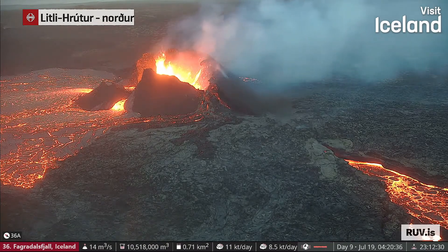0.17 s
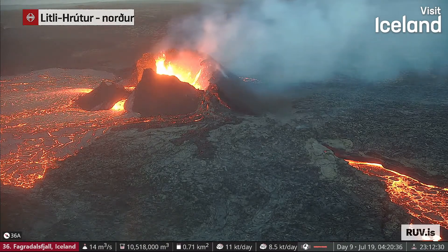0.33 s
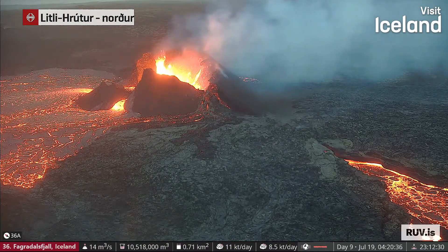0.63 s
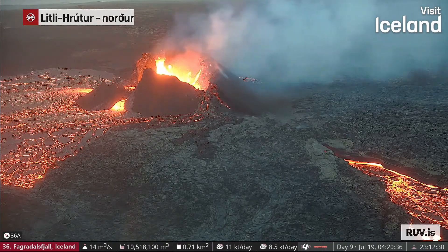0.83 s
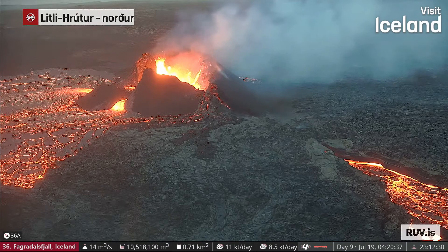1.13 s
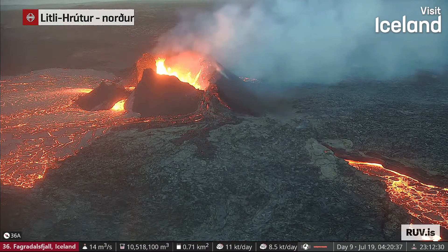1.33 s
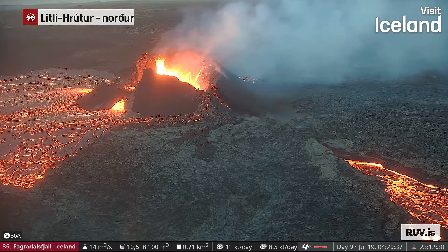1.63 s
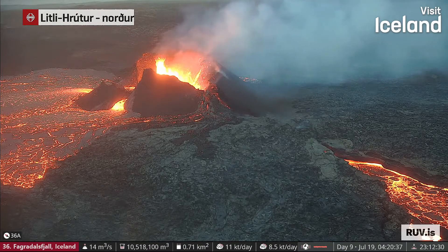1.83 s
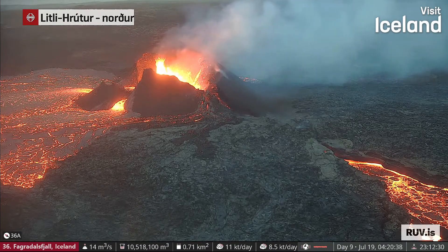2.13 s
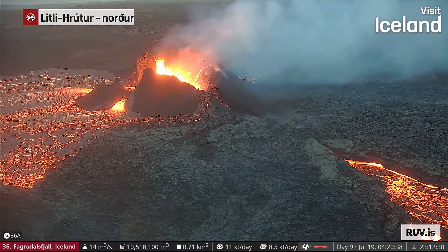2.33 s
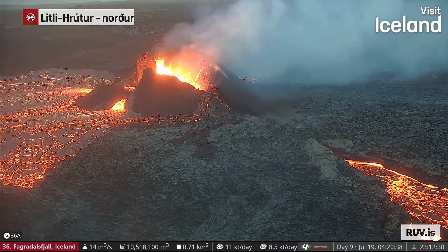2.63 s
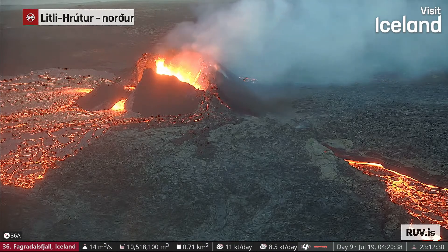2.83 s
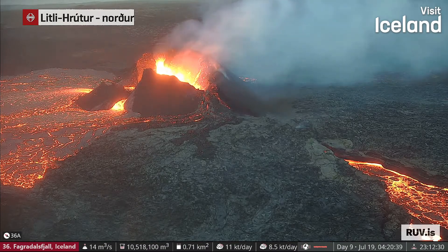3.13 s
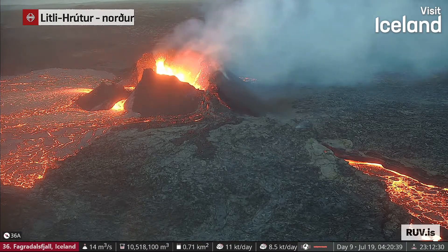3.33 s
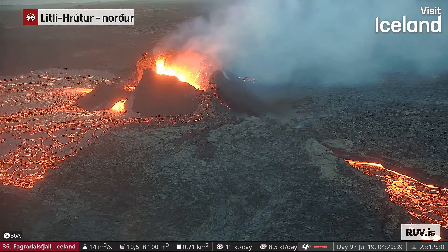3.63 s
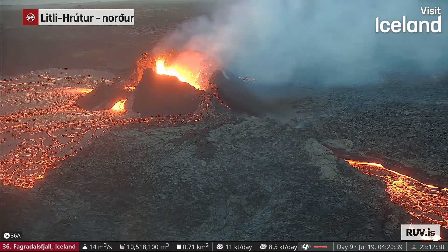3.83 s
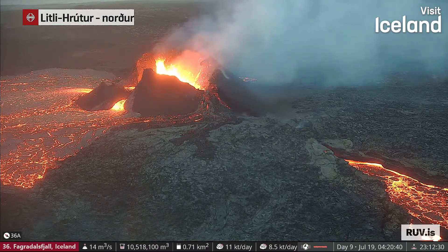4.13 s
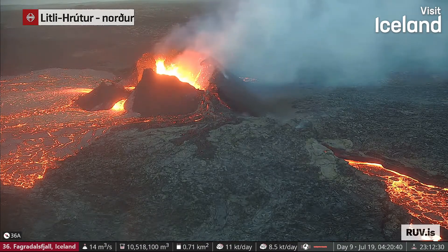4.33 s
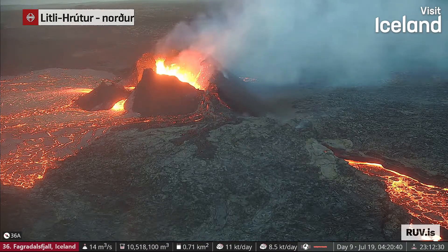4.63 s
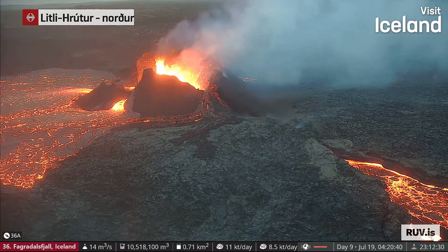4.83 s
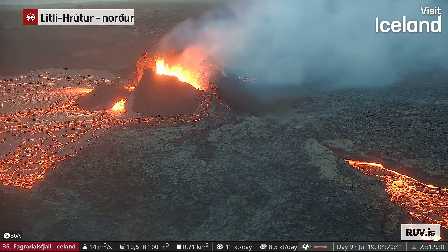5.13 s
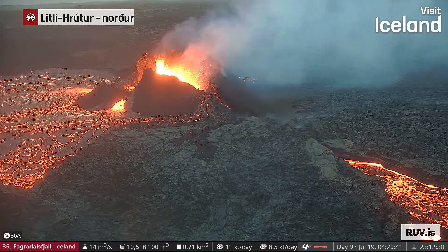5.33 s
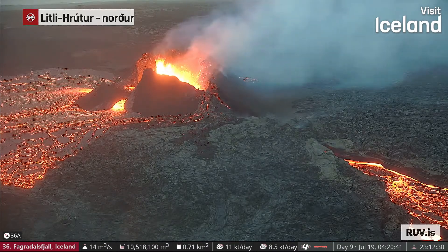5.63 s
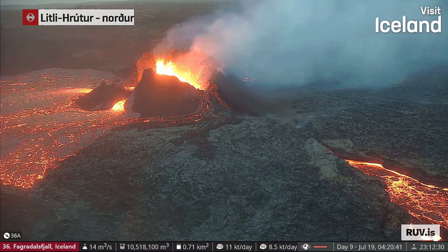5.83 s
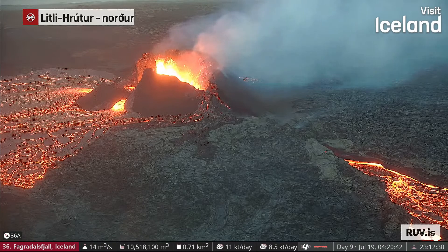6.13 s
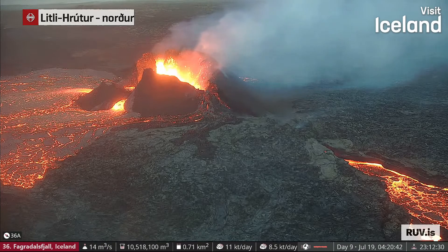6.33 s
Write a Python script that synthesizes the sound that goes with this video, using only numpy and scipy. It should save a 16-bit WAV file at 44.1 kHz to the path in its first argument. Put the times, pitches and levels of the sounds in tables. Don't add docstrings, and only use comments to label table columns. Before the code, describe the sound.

Wind buffets a close microphone with low thumps and a wavering hollow howl, over the steady deep rumble of a distant erupting volcanic vent.

```python
import sys
import numpy as np
from scipy import signal
from scipy.fft import rfft, irfft
from scipy.io import wavfile
from scipy.ndimage import uniform_filter1d, map_coordinates

SR = 44100
rng = np.random.default_rng(int(sys.argv[2]) if len(sys.argv) > 2 else 0)


def decibels_to_gain(level_db):
    exponent = np.asarray(level_db, float) / 20
    return 10 ** exponent


def dump(signal):
    limited = np.clip(np.atleast_2d(signal).T, -1, 1)
    pcm = np.round(limited * 32767).astype(np.int16)
    wavfile.write(sys.argv[1], SR, pcm)


N = 285591

HISS_SPECTRUM = [(1500, -9), (3200, 5), (4300, 6.5), (5200, 1.5), (7000, 0), (8000, -5.5), (10000, -32)]
SIZZLE_SPECTRUM = [(5000, -39.5), (7500, -3.5), (9000, 4), (10500, 1), (12000, -4), (14200, -6.5),
                   (15000, -38.5)]
THUD_SPECTRUM = [(250, -29.5), (480, 6.5), (700, 5.5), (1100, -5), (1500, -19), (2200, -40.5)]
PUFF_SPECTRUM = [(1000, -29), (1600, 3.5), (2300, -0.5), (2900, -12.5), (3600, -36)]
SPIT_SPECTRUM = [(2800, -27), (3700, -3), (4400, -0.5), (5300, -6), (6500, -5.5), (8500, -29.5)]
RUMBLE_SPECTRUM = [(60, -30), (200, 5.5), (260, 0), (400, -3), (500, -12), (650, -29.5), (1200, -64.5)]
ROAR_SPECTRUM = [(200, -27.5), (450, 9), (650, 1), (1000, -9), (1600, -15), (2000, -21.5), (2500, -23),
                 (3100, -33), (6000, -64)]
PUSH_SPECTRUM = [(1, -8), (4, 1), (18, 1), (30, -14), (60, -63.5)]
BUFFET_SPECTRUM = [(10, -31), (24, -5), (40, 0.5), (58, -1.5), (75, -15), (120, -48.5)]
FLUTTER_SPECTRUM = [(30, -39), (55, -13), (70, -3), (130, -1.5), (200, -6.5), (260, -30), (500, -76.5)]

# centre in seconds, rise in dB.
SIZZLE_SWELLS = [(.66, 4.6), (3.79, 1), (5.2, 1.1), (6.121, 2)]
# centre in seconds, peak level in dB, half length in seconds.
CREAKS = [
    (3.058, -58.5, 0.012),
    (1.925, -65, 0.0066),
    (1.4, -69, .006),
    (.877, -69, .006),
    (6.18, -71, .02),
]
# centre in Hz, width in Hz, level in dB.
SHELL_MODES = [
    (2300, 160, 2),
    (4400, 350, -3.5),
    (8900, 900, -4.5),
]
# centre in seconds, half length in seconds, strength in dB, brightness in dB.
SPATTER_BURSTS = [(.183, .015, -63.5, -1), (.22, 0.0059, -62.5, -3.5), (.594, .0027, -68.5, 6),
                  (.652, .01, -64.5, -2.5), (.875, 0.0092, -63.5, 4.5), (1.125, 0.006, -57, -1.5),
                  (1.332, .0051, -58, -3.5), (1.544, 0.014, -63, 3), (1.707, 0.002, -64.5, -1.5),
                  (1.742, 0.018, -72.5, -11.5), (1.873, .0045, -60.5, -5), (2.066, 0.0088, -70, -7.5),
                  (2.216, 0.017, -69, -10.5), (2.883, .01, -77, -5), (.373, .0082, -69.5, 1),
                  (3.702, 0.0069, -66.5, 1), (4.004, 0.014, -63, 0.5), (4.067, 0.0035, -64, 1.5),
                  (4.192, .0082, -64, 2.5), (4.443, .011, -61, -2.5), (4.567, 0.0032, -70, 2),
                  (4.717, 0.021, -63, -2), (4.943, 0.016, -64, -1.5), (4.997, .0031, -61, -1),
                  (5.136, .01, -60.5, 1.5), (5.326, 0.0068, -66, -6.5), (5.419, 0.012, -62, -1),
                  (5.615, .0062, -65.5, 1.5), (5.688, 0.0036, -56.5, 6), (6.18, .018, -68.5, 7)]
# Thud, puff, spit and fizz in an average burst, each in dB.
BURST_SHARES_DB = (12.5, -1, -8.5, -17)
# change of the same four, in dB per dB of brightness.
BRIGHT_TILT = (-2.5, -0.14, 0.44, 1.3)
# time in seconds, effort in dB.
VENT_EFFORT = [(.06, -1), (.18, 4), (.36, 1.5), (.5, 1.5), (.9, 4), (1.24, 1), (1.5, -2.5), (2, 1),
               (2.2, -2), (2.6, 1), (3.15, 0.5), (3.54, 2.5), (3.8, 1.5), (4.36, -1.5), (4.47, 2.5),
               (4.9, -1.5), (5.4, 2.5), (6.4, -1)]
# centre in seconds, rumble over the effort in dB.
GAS_SLUGS = [(.16, 0.5), (.5, 5), (1.12, 0.5), (1.42, -1), (2.02, 0.5), (2.07, -4.5), (3.64, -5),
             (3.79, 3.5), (3.91, 1), (4, -2.5), (4.2, 5.5), (4.39, -4), (4.45, 3), (4.71, 3.5),
             (4.84, -3.5), (4.96, -4), (5.2, -6.5), (5.3, 1.5), (5.38, -2.5), (5.5, 3), (5.56, -4),
             (6.28, 0.5), (6.44, 7)]
# centre in seconds, peak level in dB, half length in seconds.
GUST_FRONTS = [
    (4.032, -17.5, .02),
]
# centre in seconds, strength over the steady wind in dB,
# size from 0 (small) to 2 (large).
EDDIES = [(.14, 2, 1.3), (.4, 9.5, 1.4), (1.15, 3, 2), (1.68, 9.5, 2), (1.84, 3.5, 0.32), (1.98, 10.5, 1.5),
          (2.08, 2, 0.38), (2.26, 15, 1.63), (2.4, 3, 0.12), (2.78, 10, 2.9), (2.85, 6, 0),
          (3.179, 4.5, 0.26), (3.239, 7.5, 2.2), (.6, 2.5, 0.41), (3.5, 6.5, 0.84), (4, 16.5, 2.2),
          (4.04, 1.5, 0.5), (4.34, 5.5, 1.3), (4.5, 13.5, 1.7), (4.6, 0.5, 0.065), (4.78, 10, 1.7),
          (5, -8, 0.62), (5.04, -5, 0.24), (5.2, 4, 1.7), (5.5, 3, 1.9), (5.6, 1, 1.3), (5.9, 5.5, 3.1),
          (6.2, 1.5, 2.4), (6.27, 3, 0), (6.36, 14, 3.2)]
# time in seconds, shedding rate in Hz.
SHEDDING_RATE = [(0.03, 148), (0.5, 172), (0.66, 206), (0.82, 190), (1.5, 172), (1.85, 168), (2.1, 118),
                 (2.5, 174), (2.82, 187.2), (3.36, 155), (3.75, 172), (4.35, 150), (4.53, 182), (4.96, 182),
                 (5.19, 143), (5.38, 187), (5.7, 182), (6.44, 149.4)]
# centre in seconds, rise over the loose howl in dB.
LOCK_INS = [(.35, 6), (.58, 6.5), (.8, 13), (1.06, 11.5), (1.3, 6), (1.8, 3), (2.12, 4), (2.55, 7),
            (2.74, 10.5), (3.1, 5.5), (3.33, 9.5), (3.55, 2.5), (4.01, 5), (4.37, 1), (4.6, 1.5), (4.95, 5),
            (5.17, 6), (5.37, 8.5), (5.6, 5.5), (5.85, 8), (6.05, 3.5), (6.25, 5.5), (6.45, 6)]
# centre in seconds, rise in dB.
MOUNT_GUSTS = [(.52, 20), (.72, 16), (1, 16), (2.45, 15)]


def unit(x):
    return x / np.sqrt(np.mean(np.abs(x) ** 2) + 1e-20)


def curves(rows):
    s, *columns = np.transpose(rows)
    return [np.interp(np.arange(N) / SR, s, column) for column in columns]


def swells(rows, half_s):
    t = np.arange(N) / SR
    return sum(db * np.exp(-.5 * ((t - s) / half_s) ** 2) for s, db in rows)


def wobble(rate):
    knots = rng.standard_normal(int(N * 80 / SR) + 4)
    return map_coordinates(knots, [np.arange(N) * min(rate, 80) / SR])


def noise(spectrum, patchy_db=0):
    z = signal.stft(rng.standard_normal(N + SR), nperseg=512)[2]
    patches = uniform_filter1d(rng.standard_normal(z.shape), size=8, axis=0)
    patches = uniform_filter1d(patches, size=6, axis=1)
    white = signal.istft(z * decibels_to_gain(patchy_db * unit(patches)), nperseg=512)[1]
    f, db = np.transpose(spectrum)
    hz = np.fft.rfftfreq(len(white), 1 / SR)
    colour = decibels_to_gain(np.interp(np.log(hz + 1), np.log(f + 1), db, left=-120, right=-120))
    coloured = irfft(rfft(white) * colour, len(white))
    return unit(coloured[SR // 2:][:N])


def steadied(x, hold_s):
    power = np.abs(uniform_filter1d(x ** 2, size=round(hold_s * SR)))
    return unit(x / np.sqrt(0.4 + power))


def air():
    effort_db, = curves(VENT_EFFORT)
    fade_db = 0.23 * np.arange(N) / SR
    hiss_db = -71 + .3 * effort_db - fade_db
    breath = wobble(9)
    hiss = decibels_to_gain(hiss_db + 0.53 * breath) * noise(HISS_SPECTRUM, patchy_db=-1.0)
    sizzle_db = -73 + swells(SIZZLE_SWELLS, half_s=.2)
    sizzle_gain = decibels_to_gain(sizzle_db + .6 * breath + .6 * wobble(5.4))
    return hiss + sizzle_gain * noise(SIZZLE_SPECTRUM, patchy_db=2.0)


def creak():
    t = np.arange(N) / SR
    hz = np.fft.rfftfreq(N, 1 / SR)
    shell = sum(decibels_to_gain(db) * np.exp(-.5 * ((hz - centre) / width) ** 2) / np.sqrt(width)
                for centre, width, db in SHELL_MODES)
    scrape = unit(irfft(rfft(rng.standard_normal(N)) * shell, N))
    return scrape * sum(decibels_to_gain(db) * np.exp(-((t - s) / half) ** 4) for s, db, half in CREAKS)


def spatter():
    t = np.arange(N) / SR
    s, half, db, bright_db = np.transpose(SPATTER_BURSTS)
    puffs = [np.exp(-.5 * ((t - at) / max(width, .002)) ** 2) for at, width in zip(s, .8 * half)]
    out = np.zeros(N)
    for k, spectrum in enumerate((THUD_SPECTRUM, PUFF_SPECTRUM, SPIT_SPECTRUM, SIZZLE_SPECTRUM)):
        tilt = np.where(bright_db > 0, BRIGHT_TILT[k], k - 3 / 2)
        gains = decibels_to_gain(db + BURST_SHARES_DB[k] + bright_db * tilt)
        out += noise(spectrum) * (gains @ puffs)
    return out


def vent():
    effort_db, = curves(VENT_EFFORT)
    surge = wobble(12)
    rumble = unit(decibels_to_gain(0.3 * surge) * noise(RUMBLE_SPECTRUM, patchy_db=1.25))
    roar = unit(decibels_to_gain(0.53 * surge + 0.2 * wobble(30)) * noise(ROAR_SPECTRUM, patchy_db=1.6))
    rumble_db = -31 + effort_db + swells(GAS_SLUGS, half_s=0.026)
    fade_db = 0.67 * np.arange(N) / SR
    roar_db = -43.5 + 0.61 * effort_db - fade_db
    return decibels_to_gain(rumble_db) * rumble + decibels_to_gain(roar_db) * roar


def eddies(size):
    half_s, spread = (0.059, 0.038, 0.055)[size], 0.46
    rows = [(s, db * np.exp(-.5 * ((big - size) / spread) ** 2)) for s, db, big in EDDIES]
    return swells(rows, half_s)


def wind():
    t = np.arange(N) / SR
    fronts, calm = np.zeros(N), np.ones(N)
    for s, db, half in GUST_FRONTS:
        x = (t - s) / half
        fronts += decibels_to_gain(db) * x * np.exp(.5 - .5 * x ** 2)
        calm -= np.exp(-((t - s) / .12) ** 2)
    push = decibels_to_gain(-38 + eddies(size=2)) * calm * steadied(noise(PUSH_SPECTRUM), hold_s=0.069)
    buffet = decibels_to_gain(-29 + eddies(size=1)) * steadied(noise(BUFFET_SPECTRUM), hold_s=0.16)
    flutter = decibels_to_gain(-26.5 + eddies(size=0)) * steadied(noise(FLUTTER_SPECTRUM), hold_s=0.14)
    return push + fronts + buffet + flutter


def howl():
    rate_hz, = curves(SHEDDING_RATE)
    howl_db = -31.5 + swells(LOCK_INS, half_s=0.086)
    turn = np.exp(2j * np.pi * np.cumsum(rate_hz * (1 + .045 * wobble(16))) / SR)
    waver = unit(2.2 + .7 * wobble(46) + 1.5j * wobble(46))
    lift = unit((waver * turn).real)
    drag_waver = wobble(70) + 1j * wobble(70)
    drag = unit((drag_waver * waver * turn ** 2).real)
    mount_turn = np.exp(2j * np.pi * .77 * np.cumsum(rate_hz) / SR)
    mount = unit((waver[::-1] * mount_turn).real)
    mount_db = howl_db - 20 + swells(MOUNT_GUSTS, half_s=.07)
    return decibels_to_gain(howl_db - 0.5) * lift + decibels_to_gain(howl_db - 20) * drag + decibels_to_gain(mount_db) * mount


def scene():
    low = vent() + howl() + wind()
    near = np.exp(-np.arange(N) / SR / .006)
    low = low + (-.085 - low[0]) * near + (-.02 - low[-1]) * near[::-1]
    return (low + spatter() + air() + creak())[None]


def top_cut(x):
    return signal.sosfilt(signal.butter(12, 14300, fs=SR, output="sos"), x)


def record(dry):
    soft = dry / (1 + np.abs(dry / .38) ** 4) ** (1 / 4)
    return top_cut(soft)


dry = scene()
out = record(dry)
dump(out)
```